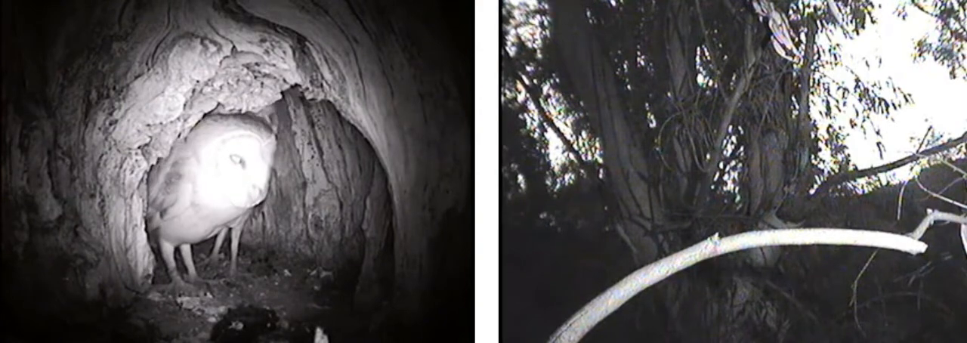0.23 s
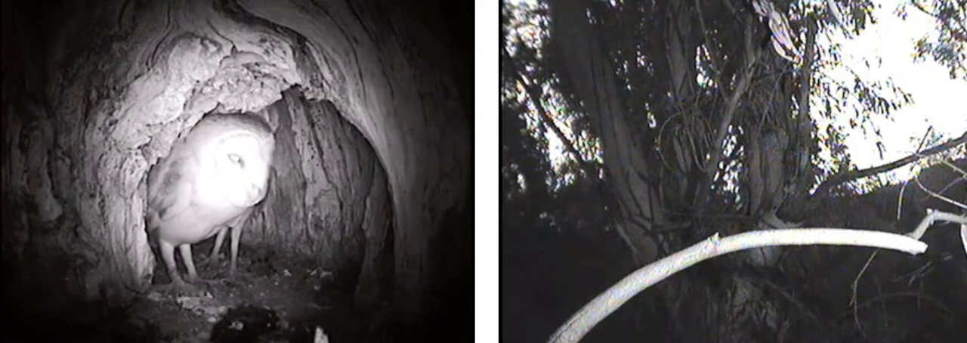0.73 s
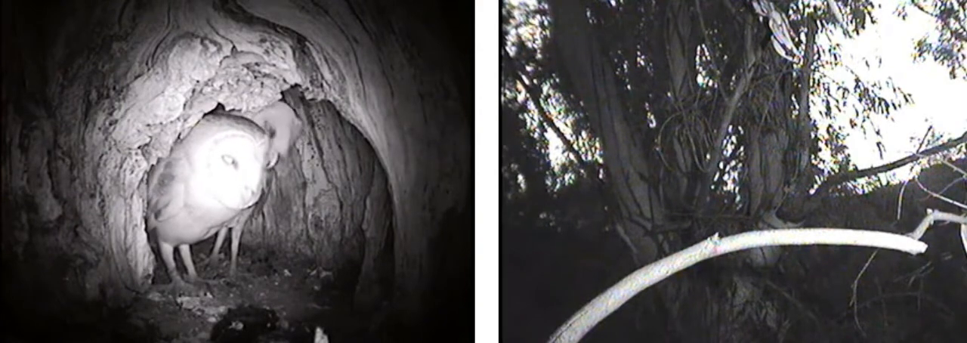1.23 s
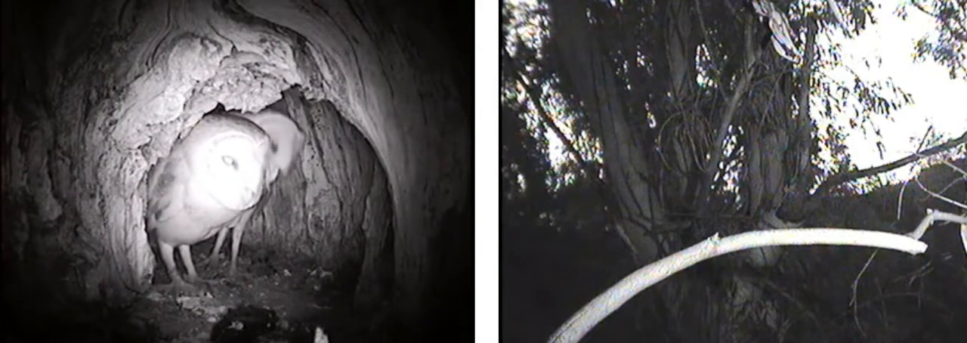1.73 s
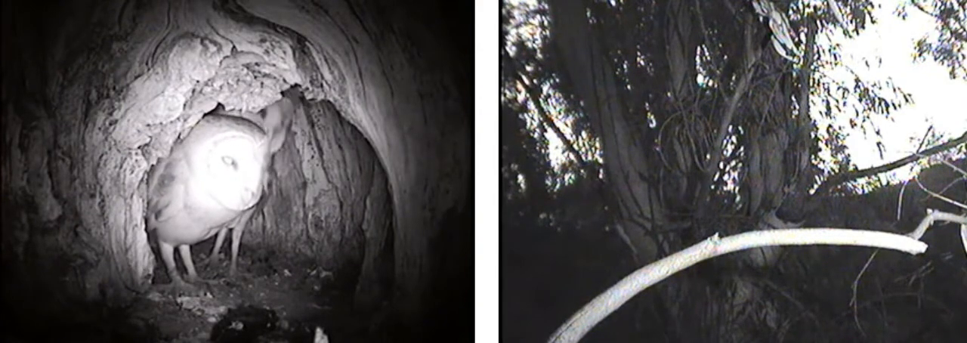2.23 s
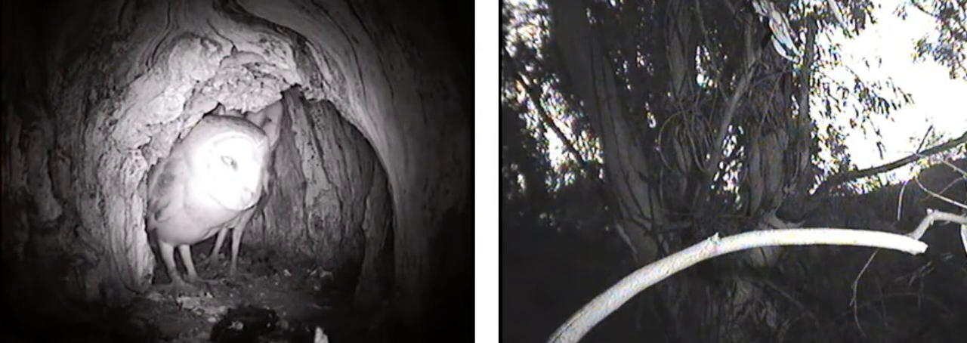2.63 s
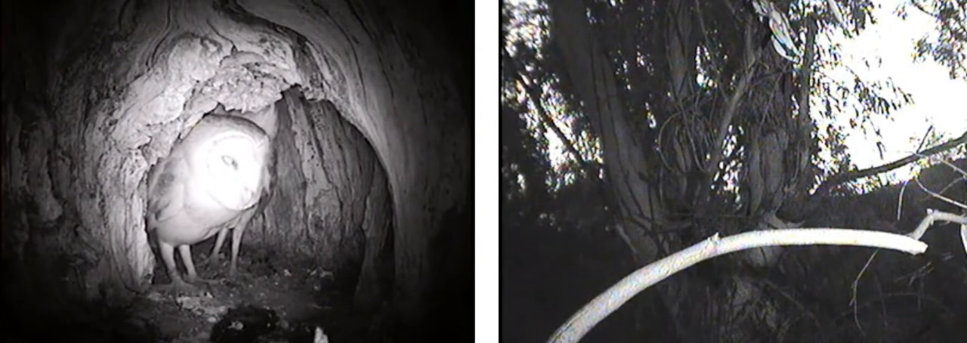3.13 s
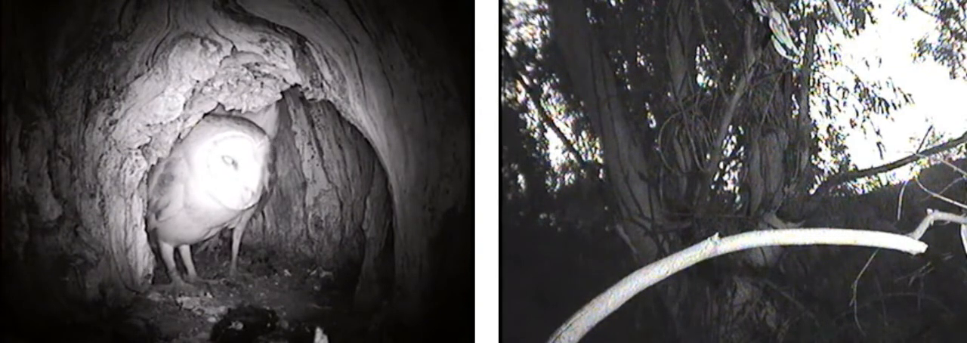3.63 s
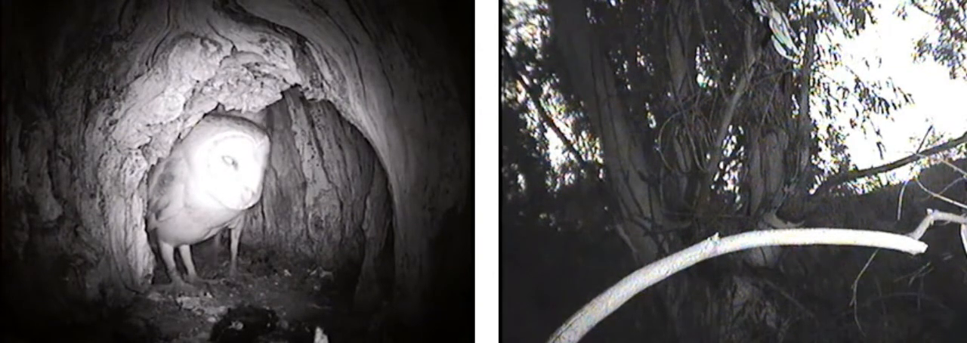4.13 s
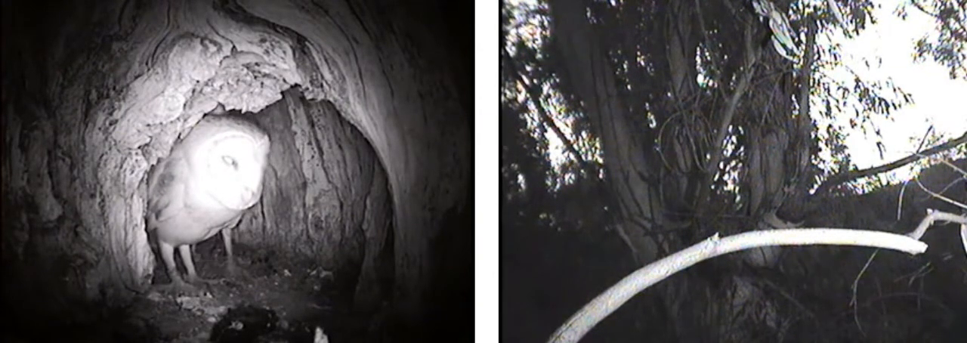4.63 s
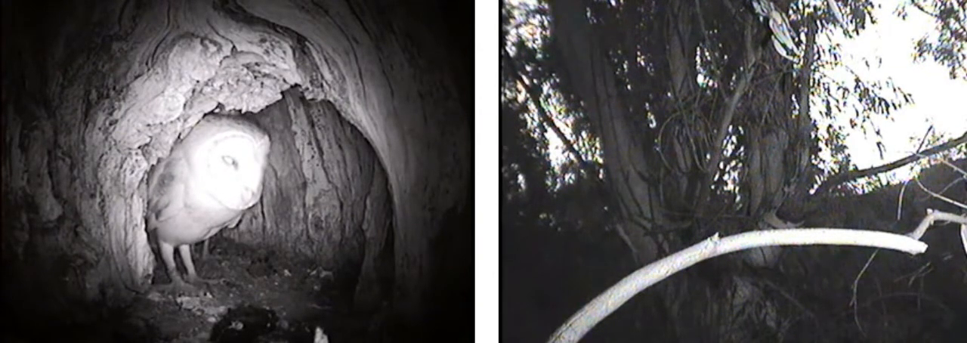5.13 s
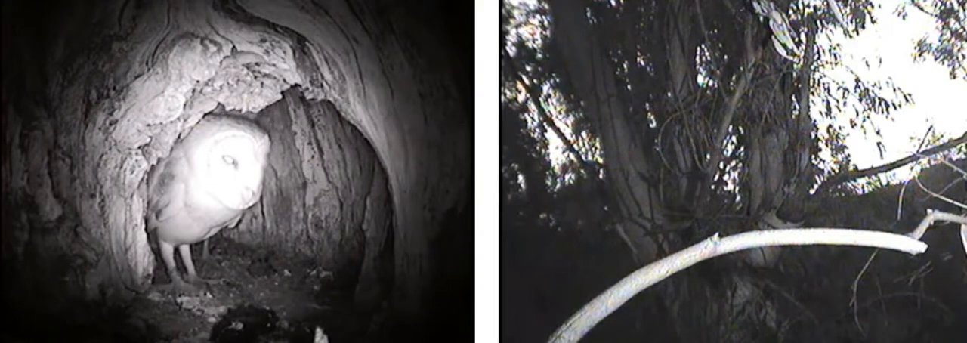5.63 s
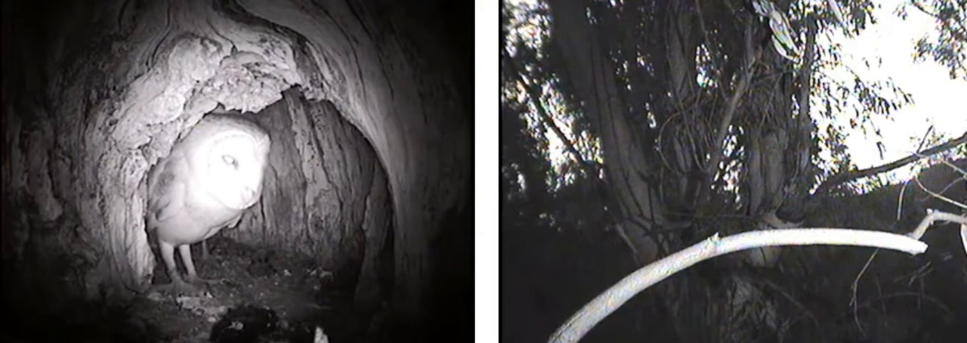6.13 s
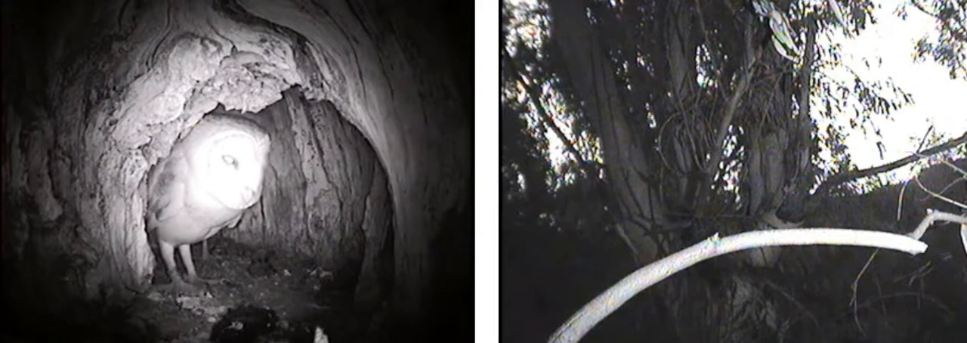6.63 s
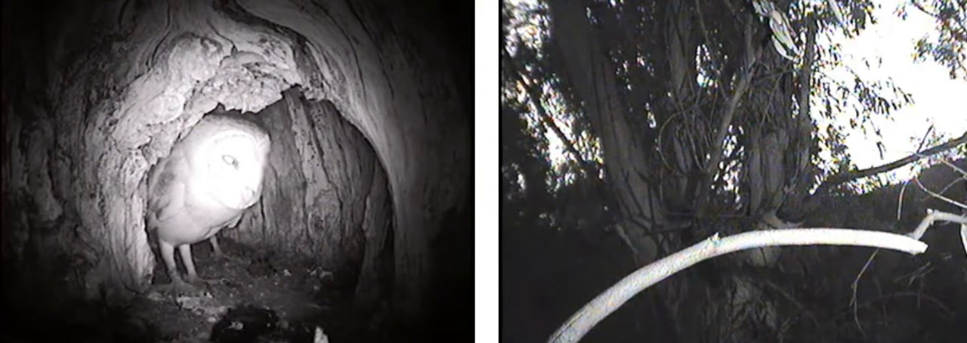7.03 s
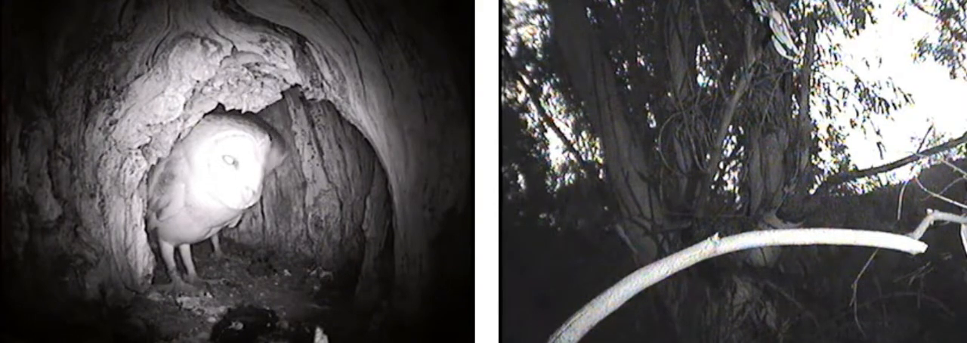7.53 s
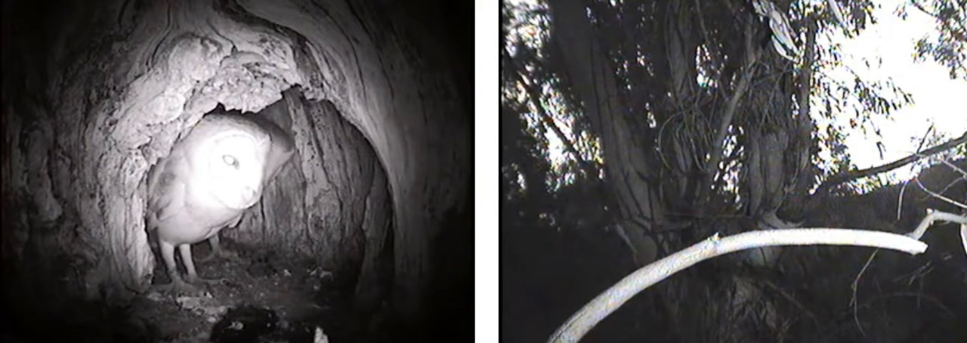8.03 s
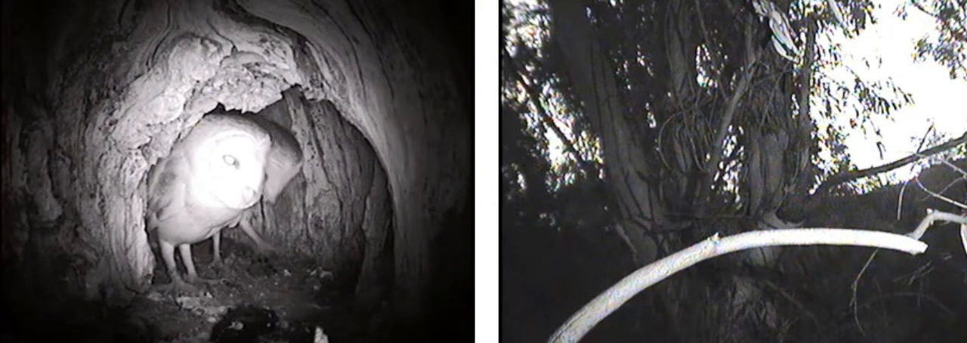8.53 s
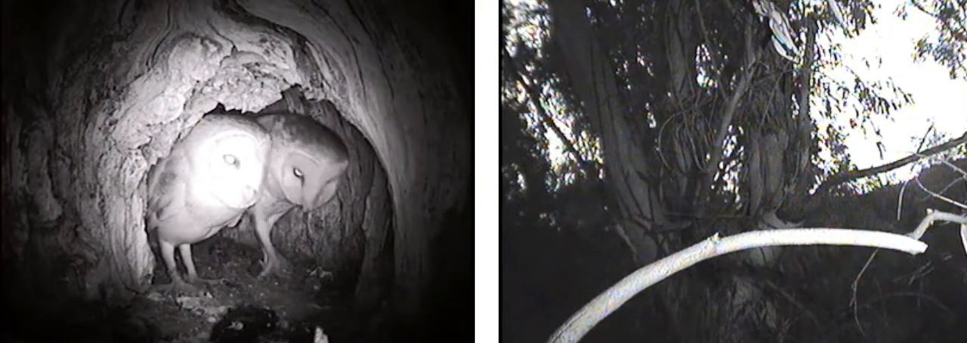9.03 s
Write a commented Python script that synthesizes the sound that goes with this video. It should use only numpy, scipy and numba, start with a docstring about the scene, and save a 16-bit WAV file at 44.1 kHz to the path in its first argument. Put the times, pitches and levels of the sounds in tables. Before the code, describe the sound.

A barn owl in a hollow tree rasps eight times very close to a small narrow-band microphone. Each call is a rough, fluttering, breathy screech of a fraction of a second, often edged by a tiny gliding pip. Between calls come faint leaf hiss, a weak electrical hum, low wind rumble and a few light claw ticks on wood.

```python
"""Barn owl in a hollow tree

A barn owl rasps eight times, close to a nest camera with a narrow-band microphone. Each rasp is breath noise
gated by fluttering membranes and rung by windpipe, throat, beak, chest and trunk resonances. Gliding near-sine
pips open most calls and close all of them. Claw ticks are damped noise knocks; leaf hiss is a bank of
flickering noise bands; gusts on the microphone are low noise; mains hum is a stack of odd multiples.
"""
import sys
import numpy as np
from scipy import signal
from scipy.io import wavfile
from scipy.ndimage import uniform_filter1d, minimum_filter1d
from numba import njit

SR = 44100
rng = np.random.default_rng(int(sys.argv[2]) if len(sys.argv) > 2 else 0)


def int16_out(signal):
    """Quantize to a 16-bit WAV file."""
    q = np.round(np.clip(np.atleast_2d(signal).T, -1, 1) * 32767)
    wavfile.write(sys.argv[1], SR, q.astype(np.int16))


N = 409688

# voice curves, one list of points a call: (time [s], level of the low strands [dB], throat centre [Hz],
# level of the beak strand [dB], beak centre [Hz])
VOICE_CURVES = [
    [(0.0, -14, 1270, -21.5, 2300), (0.05, -16.5, 1250, -20.5, 2260), (0.118, -16, 1210, -22.5, 2240),
     (0.14, -17, 1230, -37, 2140)],
    [(1.49, -39, 1340, -32, 2360), (1.516, -31.5, 1330, -19.5, 2476), (1.62, -23.5, 1328, -15.5, 2390),
     (1.70, -21, 1315, -16.5, 2360), (1.79, -15, 1300, -17, 2370), (1.81, -22.5, 1270, -35, 2300)],
    [(2.34, -26, 1310, -33.5, 2310), (2.372, -21.5, 1310, -27.5, 2540), (2.5, -17.5, 1330, -22, 2360),
     (2.6, -15, 1240, -23, 2490), (2.665, -15, 1255, -21.5, 2340), (2.69, -20.5, 1250, -32, 2230)],
    [(3.71, -40, 1280, -46, 2720), (3.74, -31, 1280, -39, 2920), (3.85, -24, 1270, -37, 2750),
     (3.905, -17, 1344, -33, 2810), (4.005, -18.5, 1400, -31, 2770), (4.052, -18, 1300, -37, 2740)],
    [(4.785, -34.5, 1270, -47.5, 2850), (4.86, -31.5, 1360, -45.5, 2850), (4.96, -16.5, 1402, -47, 2810),
     (5.07, -18, 1400, -44, 2860), (5.119, -13.5, 1400, -43.5, 2850), (5.14, -20, 1350, -57, 2840)],
    [(6.265, -47, 1320, -38.5, 2730), (6.302, -36.5, 1350, -29.5, 2670), (6.415, -32.5, 1340, -23.5, 2640),
     (6.47, -24.5, 1340, -22.5, 2690), (6.56, -28.5, 1420, -20.5, 2620), (6.582, -20, 1350, -29, 2580)],
    [(7.595, -42.5, 1295, -32, 2560), (7.625, -37.5, 1310, -25, 2725), (7.74, -31, 1420, -22, 2770),
     (7.83, -27.5, 1450, -22.5, 2744), (7.88, -26.5, 1400, -21.5, 2580), (7.89, -22.5, 1380, -29, 2570)],
    [(8.82, -30.5, 1310, -29.5, 2590), (8.84, -29.5, 1260, -23, 2700), (8.915, -28.5, 1350, -23.5, 2710),
     (9.0, -21.5, 1520, -20, 2745), (9.086, -16.5, 1540, -20, 2670), (9.14, -22.5, 1440, -27, 2640)],
]
# posture of each call, levels relative to the voice curve: (windpipe centre [Hz], windpipe width [Hz],
# throat width [Hz], beak width [Hz], middle of the throat's opening [s], throat share before [dB],
# throat share after [dB], chest level [dB], trunk level [dB], top strand centre [Hz],
# top strand level at start [dB], at end [dB], flutter depth [0-1], leaf hiss raised after the call [dB])
POSTURES = [(992, 112, 170, 103, 0.07, -18, -16, -10.5, -20, 3240, -20.5, -24, 0.46, 3.5),
            (1050, 67, 79, 79, 1.74, -16, -9.5, -10, -16.5, 3350, -40, -20, 0.36, 5),
            (1030, 106, 175, 110, 2.55, -10, -8, -12, -21.5, 3270, -18.5, -21, 0.34, 4.5),
            (1080, 320, 210, 70, 3.87, -13, -1.1, -5, -24, 3230, -12.5, -19, 0.5, 4),
            (1182, 360, 123, 140, 4.9, -5, -1.24, -3, -11, 3230, -8, -17.5, 0.39, 3),
            (1070, 71, 120, 112, 6.4, 0, -0.5, -5, -20, 3300, -33, -23.5, 0.3, 3.5),
            (992, 215, 74, 130, 7.72, -8, -5.5, -4, -28, 3150, -9.5, -10.5, 0.22, 10),
            (1043, 180, 250, 185, 8.96, -3.5, -1.7, -5.5, -11, 3170, -15, -12.5, 0.25, 4.5)]


def owl_rasps():
    """All the calls: each voice curve is sung with its own posture of the airways."""
    out = np.zeros(N)
    for curve, posture in zip(VOICE_CURVES, POSTURES):
        t, sound = rasp(curve, *posture[:-1])
        start = int(round(t[0] * SR))
        out[start:][:len(t)] += sound
    return out


# modes of the hollow trunk: (centre [Hz], width [Hz], level relative to the other modes [dB])
TRUNK_MODES = [(1830, 190, 1), (1964, 230, 6.5), (2280, 220, 1.5)]
EDGE_S, OPENING_S = 0.012, 0.06  # fade at each end of a call; half the time the throat takes to open
WAVER, WAVER_HZ = 0.012, 30  # share by which throat and beak centres wander, and how fast
# how far each part follows the beak level [0-1]; the rest follows the low strands
CHEST_FOLLOWS_BEAK, TRUNK_FOLLOWS_BEAK, TOP_FOLLOWS_BEAK = 0.6, 0.4, 0.53
# as a call closes the flutter deepens, the chest falls away first and the trunk rings on
CLOSING_S, CLOSING_FLUTTER, CHEST_SAG_DB, TRUNK_SAG_DB = 0.026, 0.22, -2.5, 2.5


def rasp(curve, pipe_hz, pipe_width, throat_width, beak_width, opens_s, share_db, open_share_db,
         chest_db, trunk_db, top_hz, top_db, top_end_db, depth):
    """One call: gated breath through windpipe, throat, beak, chest and the hollow trunk."""
    s, *columns = np.transpose(curve)
    t = np.arange(int((s[0] - EDGE_S) * SR), int((s[-1] + EDGE_S) * SR)) / SR
    low_db, throat_hz, beak_db, beak_hz = (np.interp(t, s, column) for column in columns)
    throat_hz = throat_hz * (1 + WAVER * walk(WAVER_HZ)[:len(t)])
    beak_hz = beak_hz * (1 + WAVER * walk(WAVER_HZ)[:len(t)])
    closing = swell(t, s[-1], CLOSING_S)

    depth = np.clip(depth + CLOSING_FLUTTER * closing, 0, 1)
    breath = rng.standard_normal(len(t)) * (1 - depth + depth * flutter(len(t)))

    pipe = below(strand(breath, pipe_hz, pipe_width, -6), 1255)
    throat = notch(strand(breath, throat_hz, throat_width, -8), 1.3 * throat_hz, 350)
    throat = below(throat, 0.87 * throat_hz)
    # the throat takes its share of the low strands; the windpipe keeps the rest of the power
    opening = [opens_s - OPENING_S, opens_s + OPENING_S]
    share = np.clip(undb(np.interp(t, opening, [share_db, open_share_db])), 0, 0.99)
    low = np.sqrt(1 - share ** 2) * unit(pipe) + share * unit(throat)

    # a deep dark gap lies just above the beak strand
    beak = notch(strand(breath, beak_hz, beak_width, 1), 1.178 * beak_hz, 360)
    beak = below(beak, 1.005 * beak_hz)
    chest = below(above(band(breath, 450, 500), 337), 844)
    trunk = sum(undb(db) * band(band(breath, hz, width), hz, width) for hz, width, db in TRUNK_MODES)
    top = band(band(breath, top_hz, 190), top_hz, 260)

    def blend(follows):
        return low_db + follows * (beak_db - low_db)

    chest_db = chest_db + CHEST_SAG_DB * closing + blend(CHEST_FOLLOWS_BEAK)
    trunk_db = trunk_db + TRUNK_SAG_DB * closing + blend(TRUNK_FOLLOWS_BEAK)
    top_db = np.interp(t, s[[0, -1]], [top_db, top_end_db]) + blend(TOP_FOLLOWS_BEAK)
    sound = undb(low_db) * low + undb(beak_db) * unit(beak) + undb(chest_db) * unit(chest)
    sound = sound + undb(trunk_db) * unit(trunk) + undb(top_db) * unit(top)
    edge = np.clip(np.minimum(t - t[0], t[-1] - t) / EDGE_S, 0, 1) ** 2
    return t[t >= 0], (edge * sound)[t >= 0]


FLUTTER_HZ, FLUTTER_JITTER, FLUTTER_DB = 105.1, 0.203, 2.5  # median rate, spread of log length, spread of size


def flutter(n):
    """Openings of the membranes: a swelling puff each cycle, uneven in length and size."""
    chance = rng.standard_normal((n // 100 + 2, 2))
    ends = np.cumsum(np.exp(FLUTTER_JITTER * chance[:, 0]) * SR / FLUTTER_HZ)
    cycle = np.interp(np.arange(n), ends - ends[0], np.arange(len(ends)))
    size = undb(FLUTTER_DB * chance[cycle.astype(int), 1])
    return unit(np.sin(np.pi * cycle) ** 2 * size)


def strand(breath, hz, width, skirt_db):
    """An airway resonance: a narrow ringing core on a wider skirt."""
    core = band(breath, hz, width)
    skirt = undb(skirt_db) * band(breath, hz, 3.33 * width)
    return band(core + skirt, hz, 4.95 * width)


def notch(x, hz, width):
    """Anti-resonance of a side cavity."""
    return x - band(x, hz, width)


# clear pips: (time [s], level [dB, 6 under the peak], start pitch [Hz], end pitch [Hz], length [s])
PIPS = [(0.12, -24.5, 2115, 1750, 0.035), (1.479, -33.5, 1930, 2260, 0.017),
        (1.807, -30, 2110, 1970, 0.018), (2.33, -30.5, 1000, 1030, 0.014),
        (2.328, -35.5, 2130, 2200, 0.021), (2.676, -29, 2283, 1890, 0.033), (4.043, -21, 1430, 983, 0.033),
        (4.775, -29.5, 1150, 1160, 0.0064), (5.14, -19.5, 1400, 1125, 0.024),
        (6.251, -34.5, 1280, 1310, 0.009), (6.581, -28.5, 1445, 1250, 0.03),
        (7.581, -35.5, 1160, 1174, 0.01), (7.863, -37, 1497, 1346, 0.059), (6.257, -39, 2300, 2640, 0.01),
        (6.585, -33, 2760, 2350, 0.02), (7.577, -42.5, 2310, 2630, 0.028),
        (7.886, -37.5, 2610, 2450, 0.023), (8.801, -35, 2100, 2650, 0.02), (9.14, -31.5, 2770, 2480, 0.019),
        (8.806, -17.5, 1086, 1246, 0.011), (9.121, -30, 1448, 1240, 0.048)]


def owl_pips():
    """Short clear whistles at the edges of the calls."""
    out = np.zeros(N)
    for s, *shape in PIPS:
        sound = pip(*shape)
        out[int(s * SR):][:len(sound)] += sound
    return out


def pip(db, hz, end_hz, length):
    """A gliding near-sine: quick rise, slower fall."""
    u = np.arange(int(length * SR)) / (length * SR)
    phase = 2 * np.pi * np.cumsum(hz + (end_hz - hz) * u) / SR
    envelope = np.sin(np.pi * u ** 0.62) ** 0.74
    return undb(db) * 2 * envelope * np.sin(phase)


# claw ticks on wood: (time [s], peak level [dB], centre [Hz])
CLAW_TICKS = [(1.0264, -35.5, 1240), (5.6807, -25.5, 1280), (6.97, -27.5, 2140), (7.985, -29, 1200),
              (8.535, -25.5, 2130)]


def claw_ticks():
    """Short damped knocks with a little grit: decaying noise through one resonance."""
    out, t = np.zeros(N), np.arange(SR // 30) / SR
    for s, db, hz in CLAW_TICKS:
        knock = band(rng.standard_normal(len(t)) * np.exp(-t / 0.0033), hz, 360)
        out[int(s * SR):][:len(t)] += undb(db) * knock / np.abs(knock).max()
    return out


# spectrum of the leaf hiss: (frequency [Hz], relative level [dB per Hz])
LEAF_SPECTRUM = [(200, -24.5), (280, -17), (350, -2), (700, -5.5), (1200, -5), (1800, -7.5), (2500, -4.5),
                 (3400, -7.5), (4300, -6)]
# moments when the leaves hush: (time [s], level change [dB], half length [s])
LEAF_LULLS = [(8.25, -6, 0.4)]
LEAF_DB, LEAF_LOW_DB = -43.5, -2.5  # rest level; extra under 1 kHz, relative to the upper bands
# the hiss stays raised after a call, most in the bass, and sinks back over these times
RAISED_S, RAISED_LOW_DB, RAISED_LOW_S = 0.3, 5, 0.34


def leaves(t):
    """Third-octave noise bands that swell together and flicker alone; raised after each call."""
    ends = np.array([curve[-1][0] for curve in VOICE_CURVES])
    last = np.maximum(np.searchsorted(ends, t) - 1, 0)
    since = np.abs(t - ends[last])  # so the hiss also swells towards the first call's end
    raised_db = np.array(POSTURES)[last, -1] * np.exp(-since / RAISED_S)
    lull_db = sum(db * swell(t, s, half) for s, db, half in LEAF_LULLS)
    low_db = LEAF_LOW_DB + RAISED_LOW_DB * np.exp(-since / RAISED_LOW_S)

    out, (f, per_hz) = 0, np.transpose(LEAF_SPECTRUM)
    for hz in 220 * 2 ** np.arange(0, 4.3, 1 / 3):
        flicker_db = walk(6.7)
        db = np.interp(np.log(hz), np.log(f), per_hz) + flicker_db + (hz < 1000) * low_db
        out = out + undb(db) * band(band(rng.standard_normal(N), hz, hz / 3), hz, hz / 2)
    return unit(out) * undb(LEAF_DB + raised_db + lull_db)


# gusts on the microphone: (time [s], half length [s], rumble level [dB], buffet level [dB])
GUSTS = [(0.0, 0.17, -72, -48.5), (1.0, .5, -66.5, -60.5), (2.55, .3, -57, -70), (3.3, 0.51, -63, -56.5),
         (4.1, 0.36, -62.5, -60), (5.48, .15, -42, -56), (5.4, 0.74, -53, -75), (8.3, .15, -64, -51),
         (9.1, 0.16, -54.5, -61.5)]
BREEZE_DB, BREEZE_RISE_DB, BUFFET_DB = -59.5, 6, -69  # rumble at the start, its rise to the end; steady buffet


def wind_on_microphone(t):
    """Wind pressure on the microphone: a dull flickering rumble and a deeper buffet."""
    rumble_gain = undb(BREEZE_DB + BREEZE_RISE_DB * t / t[-1])
    rumble_gain = rumble_gain + sum(undb(db) * swell(t, s, half) for s, half, db, _ in GUSTS)
    buffet_gain = undb(BUFFET_DB) + sum(undb(db) * swell(t, s, half) for s, half, _, db in GUSTS)
    rumble = above(band(band(rng.standard_normal(N), 82, 120), 170, 220), 63)
    buffet = band(rng.standard_normal(N), 30, 56)
    flicker = undb(walk(18))
    return unit(rumble) * rumble_gain * flicker + unit(buffet) * buffet_gain


# hum lines: (multiple of mains, RMS level at the start before wavering [dB])
HUM_LINES = [(1, -55.5), (5, -63), (7, -55.5), (9, -59.5), (11, -61), (13, -64)]
MAINS_HZ, HUM_WAVER_DB, HUM_FADE_DB = 60.25, 1.5, -5  # the fade runs from start to end


def mains_hum(t):
    """Mains hum and its odd multiples, each line wavering a little in level."""
    out = 0
    for multiple, db in HUM_LINES:
        gain = undb(db + HUM_WAVER_DB * walk(2.7)) * np.sqrt(2)
        out = out + gain * np.sin(2 * np.pi * multiple * MAINS_HZ * t)
    return out * undb(HUM_FADE_DB * t / t[-1])


def undb(db):
    """Decibels to amplitude."""
    return 10 ** (np.asarray(db) / 20)


def unit(x):
    """Scale to an RMS of 1."""
    return x / np.sqrt(np.mean(x ** 2))


def swell(t, s, half):
    """A bell-shaped rise and fall around s."""
    return np.exp(-((t - s) / half) ** 2)


def walk(rate):
    """Random levels held 1 / rate s and slewed twice."""
    k = int(SR / rate)
    held = np.repeat(rng.standard_normal(N // k + 1), k)
    return 1.3 * uniform_filter1d(uniform_filter1d(held, k), k)[:N]


@njit
def svf(x, hz, width, low):
    """State-variable filter with a moving centre; band-pass, or resonant low-pass if low is 1."""
    y, b, l = np.empty(len(x)), 0., 0.  # b and l: band and low states
    for i in range(len(x)):
        g, k = np.tan(np.pi * hz[i] / SR), width[i] / hz[i]
        v = (b + g * (x[i] - l)) / (1 + g * (g + k))
        y[i] = low * (l + g * v) + (1 - low) * k * v
        b, l = 2 * v - b, l + 2 * g * v
    return y


def band(x, hz, width):
    """One resonance: a band-pass with unit gain at its centre."""
    return svf(x, hz + np.zeros(len(x)), width + np.zeros(len(x)), 0.)


def below(x, hz):
    """Steep fall above hz."""
    hz = hz + np.zeros(len(x))
    return svf(svf(x, hz, 0.86 * hz, 1.), hz, 0.86 * hz, 1.)


def above(x, hz):
    """Steep fall below hz."""
    return signal.sosfilt(signal.butter(4, hz, "high", fs=SR, output="sos"), x)


def scene():
    """Owl in front, then claws, leaves, wind and hum, in one channel."""
    t = np.arange(N) / SR
    owl = owl_rasps() + owl_pips()
    return (owl + claw_ticks() + leaves(t) + wind_on_microphone(t) + mains_hum(t))[None]


PEAK = 0.5  # limiter ceiling, full scale 1


def limit(x):
    """A quick limiter: the gain dips smoothly around any peak above PEAK."""
    reach = SR // 1000  # 1 ms
    gain = np.minimum(1, PEAK / (np.abs(x) + 1e-9))
    return x * uniform_filter1d(minimum_filter1d(gain, 2 * reach), reach)


LINK_HZ, TOP_HZ = 3461, 15700  # upper edge of the camera's band; upper edge of everything
LEAK_DB, HISS_DB = -11.5, -74  # skirt above the band; line hiss before the last low-pass


def record(dry):
    """The camera passes a narrow band with a faint skirt and limits the peaks; broad line hiss is added."""
    camera = signal.sosfilt(signal.ellip(10, 0.5, 60, LINK_HZ, fs=SR, output="sos"), dry)
    near = signal.butter(5, [LINK_HZ, 1.06 * LINK_HZ], "band", fs=SR, output="sos")
    far = signal.butter(2, [LINK_HZ, 1.193 * LINK_HZ], "band", fs=SR, output="sos")
    skirt = signal.sosfilt(near, dry) + undb(-7.5) * signal.sosfilt(far, dry)
    line = undb(HISS_DB) * unit(band(rng.standard_normal(N), 7600, 12000))
    mix = limit(camera + undb(LEAK_DB) * skirt) + line
    return signal.sosfilt(signal.ellip(10, 0.2, 70, TOP_HZ, fs=SR, output="sos"), mix)


dry = scene()
out = record(dry)
int16_out(out)
```